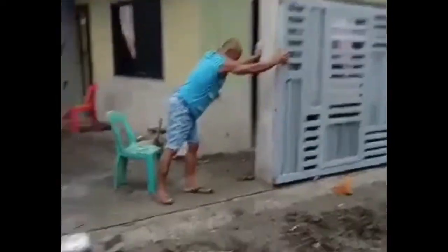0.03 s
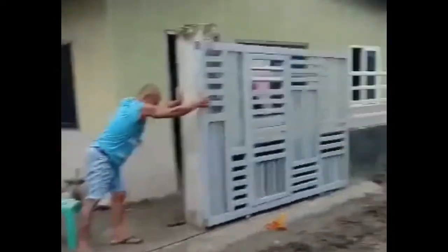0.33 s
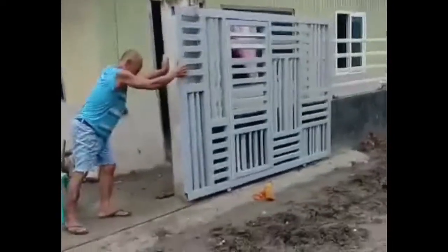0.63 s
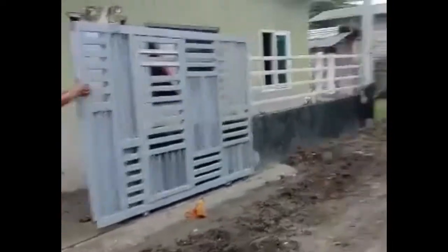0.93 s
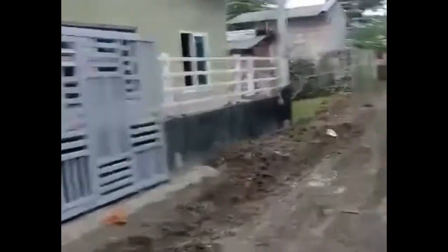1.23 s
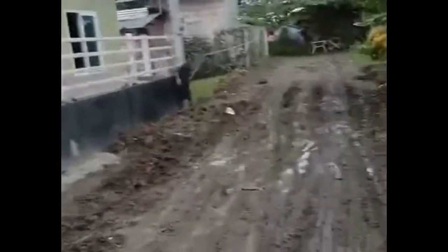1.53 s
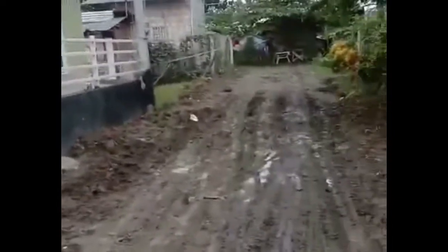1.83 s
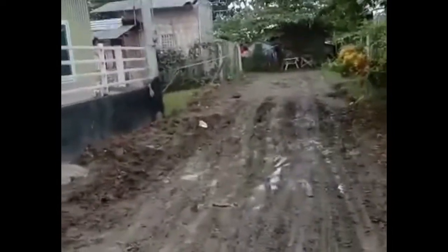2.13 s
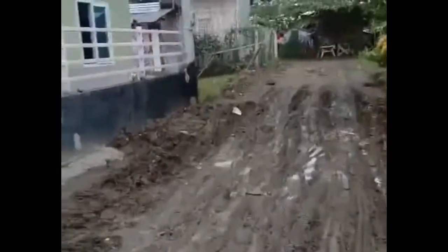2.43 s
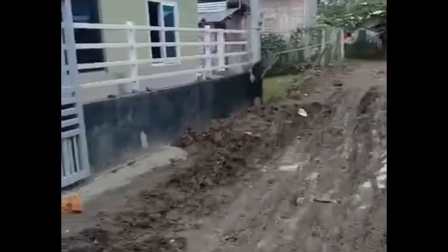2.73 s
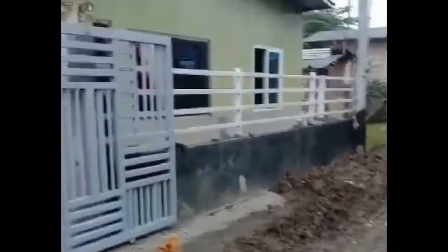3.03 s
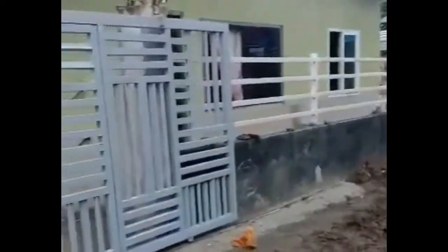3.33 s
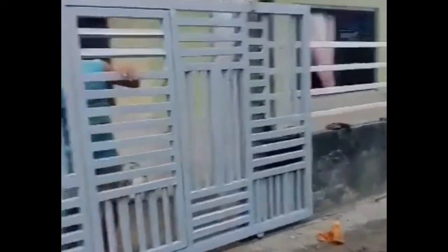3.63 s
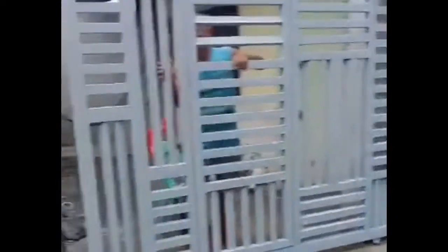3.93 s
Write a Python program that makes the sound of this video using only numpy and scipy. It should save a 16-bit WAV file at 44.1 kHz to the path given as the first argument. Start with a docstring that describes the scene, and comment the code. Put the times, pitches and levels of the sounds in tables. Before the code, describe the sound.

Metal gate rolling with gritty grinding and knocks, ending in a few ringing clanks.

```python
"""A barred steel gate rumbles and knocks along its ground track, then clanks steel on steel.
Its wheels grind over grit and set the frame ringing; bumps knock and rattle it.
Thin squeaks come on the way and between the clanks at the end of the travel.
Heard from beside the gate, outside a house in still air, on one hand-held microphone
that takes a few soft bumps."""
import sys
import numpy as np
from scipy import signal
from scipy.fft import rfft, irfft
from scipy.io import wavfile

SR = 44100
rng = np.random.default_rng(int(sys.argv[2]) if len(sys.argv) > 2 else 0)


def bounce(signal):
    """Save signal as a 16-bit WAV file at the path given by the first command-line argument."""
    frames = np.transpose(np.atleast_2d(signal))
    limited = np.clip(frames, -1, 1)
    pcm = np.round(limited * 32767).astype(np.int16)
    wavfile.write(sys.argv[1], SR, pcm)


N = 176400
TIME = np.arange(N) / SR
TAIL = TIME[:32768]   # seconds since a strike
WHEELS_STOP_S = 2.93
TICK_RISE_S, BOOM_RISE_S = 0.0011, 0.0019   # ringing builds up as it spreads through the bars

# How hard the wheels grind, down at the track: time_s, level_db
ROLL_LEVEL = [(0, -26), (.2, -34.5), (.33, -33), (.5, -37.5), (.64, -43), (.74, -38.5), (.79, -36),
              (.86, -31), (.97, -26), (1.15, -27.5), (1.33, -28), (1.55, -31), (1.75, -35.5), (2.05, -41.5),
              (2.25, -40.5), (2.35, -36), (2.6, -41), (2.84, -40.5), (2.93, -48.5), (3.02, -54.5),
              (3.55, -54.5), (3.64, -50.5), (3.72, -54), (4, -97)]
# Colour of the barred frame: frequency_hz, level_db
FRAME_COLOUR = [(150, -20), (250, -2.5), (370, -7), (520, -10), (720, -5), (900, -2), (1050, -6.5),
                (1400, -4.5), (1900, -9), (2250, -6), (2900, -14), (4000, -19.5), (5300, -14.5),
                (6200, -24), (7300, -24), (8100, -39.5), (9500, -34.5), (13000, -42)]
# Hollow hum of the tubes, lingering as the wheels slow: frequency_hz, level_db
HUM_COLOUR = [(150, -25), (520, 4), (620, 0.5), (720, 1), (890, 3), (1020, -30), (1170, -16), (1270, 5),
              (1370, -4.5), (1500, -35), (3000, -72)]
# Rumble of the ground under the gate: frequency_hz, level_db
RUMBLE_COLOUR = [(25, -28), (45, -56), (70, -1), (110, -6), (200, -3), (320, -9), (600, -35), (2000, -65)]
def rolling(spots=6, reference_db=-35.5):
    """The wheels crush grit and shake the frame at several spots; the tubes hum and the track rumbles."""
    level_db = roll_db(TIME)
    swing_db = level_db - reference_db
    hum = amp(-39 + 0.89 * swing_db) * np.clip((WHEELS_STOP_S - TIME) * 10, 0, 1)
    frame = 0
    for _ in range(spots):
        for force, colour in ((amp(level_db), FRAME_COLOUR), (hum, HUM_COLOUR)):
            grind = force * wandering_load() * grit_jolts()
            ring = steel(colour, patchy_db=4.5) * swell(rise_s=0.0016)
            frame = frame + drive(grind, ring)
    rumble = noise(RUMBLE_COLOUR, N) * amp(-44 + 0.53 * swing_db)
    return frame / np.sqrt(spots) + rumble


def roll_db(time_s):
    """How hard the wheels grind at a given moment."""
    return np.interp(time_s, *np.transpose(ROLL_LEVEL))


def wandering_load(shifts_per_s=16, spread_db=6.5):
    """One spot's share of the load wanders, so the ringing keeps changing colour; rms 1."""
    knots = np.clip(rng.standard_normal(400), -1.6, 1.6)
    return unit(amp(spread_db * np.interp(TIME * shifts_per_s, np.arange(len(knots)), knots)))


def grit_jolts(per_s=700, spread_db=3.5):
    """Grit gives a wheel small random jolts of uneven size; rms 1."""
    sizes = amp(spread_db * np.minimum(rng.exponential(1, N), 4)) * rng.choice([-1, 1], N)
    return unit(sizes * (rng.random(N) < per_s / SR))


# Ringing time of the steel: frequency_hz, t60_s
STEEL_DECAY = [(200, 0.19), (700, 0.31), (1300, 0.27), (2500, 0.24), (5500, 0.21), (11000, 0.1)]
# Hollow resonances of the frame: centre_hz, width_hz, boost_db
FRAME_RESONANCES = [(307, 23.4, 9), (449, 16.6, 6.5), (640, 58, 3.5), (728, 28, 4.5), (882, 12, 7),
                    (1270, 71, 9), (1544, 54, 0.5), (1680, 24, 2.5), (5650, 270, 2)]
def steel(colour, ring_scale=1, tilt_db=0, patchy_db=4, patch_width_hz=230):
    """The gate struck at one spot: countless close modes of random strength, the highest dying first."""
    f = np.fft.rfftfreq(len(TAIL), 1 / SR)
    # each spot favours some groups of modes
    groups = np.interp(f / patch_width_hz, np.arange(400), rng.standard_normal(400))
    db = patchy_db * groups * f / (f + 1000)
    db += tilt_db * np.log2(np.clip(f, 200, 3000) / 1000)
    db += sum(boost / (1 + (2 * (f - centre) / width) ** 2) for centre, width, boost in FRAME_RESONANCES)
    db += over_hz(*np.transpose(colour), len(TAIL))
    modes = rfft(unit(irfft(rfft(rng.standard_normal(len(TAIL))) * amp(db))))
    hz, t60_s = np.transpose(STEEL_DECAY)
    bands = [irfft(modes * over_hz(hz, share, len(TAIL))) for share in np.eye(len(hz))]
    return sum(band * decay(t60 * ring_scale) for band, t60 in zip(bands, t60_s))


# Steel meets steel at the end of the track: start_s, clang_db, tick_db
END_BLOWS = [(3.184, -11.5, -16), (3.2, -20.5, -16), (3.236, -14, -13.5), (3.275, -14, -33),
             (3.463, -24.5, -22.5), (3.687, -14, -10)]
# Colour of the whole gate clanging: frequency_hz, level_db
CLANG_COLOUR = [(150, -37), (550, -45), (750, -13), (1050, -8.5), (1260, -2.5), (1420, -5.5), (1750, 0),
                (2400, -0.5), (2900, -4), (3500, -9.5), (5500, -12.5), (8000, -17.5), (13000, -20)]
# Clear tones of the struck tubes: pitch_hz, level_db, t60_s
TUBE_TONES = [(1010, -18.5, 1), (1300, -5.5, 0.62), (1380, -10.5, 0.36), (1720, 0, 0.32), (1940, -2.5, .35),
              (2090, -5, 0.2), (2140, 2, 0.2), (2440, -21.5, 0.58), (2360, 3, 0.21), (2554, -5, 0.28),
              (2633, 0.5, 0.35), (3570, -12.5, 0.5), (4700, -18, 0.5), (5230, -9, 0.3)]
def clanks(tubes_db=-10.5, uneven_db=2):
    """Hard blows set the whole gate clanging, with the tones of its tubes on top."""
    out = np.zeros(N)
    hz, mode_db, t60_s = np.transpose(TUBE_TONES)[:, :, None]
    tones = np.sin(2 * np.pi * hz * TAIL) * decay(t60_s)
    for start_s, clang_db, tick_db in END_BLOWS:
        strength = amp(tubes_db + mode_db + uneven_db * rng.standard_normal(hz.shape))
        tubes = np.sum(strength * rng.choice([-1, 1], hz.shape) * tones, axis=0)
        clang = (steel(CLANG_COLOUR, ring_scale=1.54) + tubes) / np.sqrt(2)
        add(out, start_s, amp(clang_db) * clang * swell(rise_s=0.004) + amp(tick_db) * tick())
    return highpass(out, hz=680, order=4)   # hard blows leave the low modes still


def first_touch(start_s=3.154, pitch_hz=785, level_db=-25.5):
    """One tube rings a hollow note as the gate makes contact, just before the clanks."""
    out = np.zeros(N)
    note = np.sin(2 * np.pi * pitch_hz * TAIL) * decay(t60_s=0.1) * swell(BOOM_RISE_S)
    add(out, start_s, amp(level_db) * note)
    return out


# Knocks of the frame: bumps along the track, then the gate's first touch and the low boom under
# its first clank: start_s, boom_db, tilt_db_per_octave, tick_db
FRAME_KNOCKS = [(.046, -39, -3, -29.5), (.060, -20, -0.5, -30), (.084, -21, 0.5, -32),
                (.102, -17.5, -1, -32), (.125, -28, -1, -50), (.221, -33, -7, -38), (.328, -29, 1.5, -55),
                (0.364, -26, 1.5, -50), (.478, -40, 2, -40), (.549, -33.5, 11, -41), (.753, -30, -1.5, -53),
                (.783, -20, -2, -26), (.891, -35, 5, -32.5), (.975, -24, 2.5, -42), (1.03, -36, -19, -42),
                (1.092, -24, 7.5, -30.5), (1.188, -16, 0, -22.5), (1.225, -21, -1.5, -35),
                (1.271, -22, -1.5, -27), (1.322, -50, -6, -34), (1.385, -63, -3, -54),
                (1.454, -21, 2.5, -35), (1.589, -22, 3, -25.5), (1.662, -27, -4.5, -32),
                (1.770, -36, -3, -55), (1.792, -28.5, 2, -28.5), (1.882, -36.5, 7, -66),
                (1.963, -36, 11, -47), (2.057, -35.5, 8, -34), (2.152, -53, -13, -40.5),
                (2.181, -33.5, -7.5, -42), (2.388, -23.5, -2, -30.5), (2.423, -30.5, 3, -32.5),
                (2.557, -35.5, 2, -27), (2.754, -30, -2, -22.5), (2.792, -37, -13, -63),
                (2.871, -20, -1, -24), (2.887, -20.5, -2.5, -52), (2.925, -30.5, -6.5, -47),
                (3.154, -23.5, 4.5, -35), (3.205, -33.5, -8, -45)]
# Colour of the frame booming after a knock: frequency_hz, level_db
BOOM_COLOUR = [(150, -19), (300, -13), (450, -12), (600, -6), (760, -1.5), (1000, -4.5), (1350, -1.5),
               (1600, -4.5), (1900, -7.5), (2300, -5.5), (3000, -14), (5500, -24), (8000, -34),
               (13000, -45)]
def knocks():
    """Each knock ticks at the point of contact and swells into the frame."""
    out = np.zeros(N)
    for start_s, boom_db, tilt_db, tick_db in FRAME_KNOCKS:
        boom = steel(BOOM_COLOUR, tilt_db=tilt_db) * swell(BOOM_RISE_S)
        add(out, start_s, amp(boom_db) * boom + amp(tick_db) * tick())
    return highpass(out, hz=240)   # a knock hardly moves the lowest modes


# Colour of a hard tick on the steel: frequency_hz, level_db
TICK_COLOUR = [(300, -45), (600, -21.5), (1200, -14), (2400, -3), (3300, -8), (4400, 0), (5500, 0),
               (6200, -4.5), (7300, -5), (8100, -20.5), (9500, -11.5), (11000, -16.5), (13000, -32.5)]
def tick(crack_db=-4, crack_s=0.013):
    """A hard contact: a crack, then bright, short ringing."""
    crack = amp(crack_db) * np.exp(-TAIL / crack_s)
    return steel(TICK_COLOUR, patchy_db=3.5) * swell(TICK_RISE_S) * (1 + crack) / 2


def chatter(count=32, relative_db=-10.5, spread_db=3.5):
    """Loose parts tick now and then while the gate moves, each with a colour of its own."""
    out = np.zeros(N)
    for k, (jitter, size) in enumerate(rng.uniform(-1, 1, (count, 2))):
        start_s = (k + 1 + jitter) / (count + 1) * WHEELS_STOP_S
        level_db = roll_db(start_s) + relative_db + spread_db * size
        ring = steel(TICK_COLOUR, ring_scale=0.7, patchy_db=9) * swell(TICK_RISE_S)
        add(out, start_s, amp(level_db) * ring)
    return out


def grit_bursts(count=70, low_hz=2790, high_hz=11950, relative_db=-4.5, spread_db=4.5):
    """Bits of grit burst under the wheels, each crunching in a narrow band of its own."""
    out = np.zeros(N)
    for when, pitch, size in rng.random((count, 3)):
        start_s, hz = when * WHEELS_STOP_S, low_hz * (high_hz / low_hz) ** pitch
        level_db = roll_db(start_s) + relative_db + spread_db * (2 * size - 1)
        level_db -= 8.5 * np.log2(hz / low_hz)   # higher bursts are fainter
        band = unit(signal.lfilter(*signal.iirpeak(hz, Q=14, fs=SR), rng.standard_normal(len(TAIL))))
        add(out, start_s, amp(level_db) * band * swell(TICK_RISE_S) * decay(t60_s=0.12))
    return out


# Thin squeaks and short scrapes at the gate: start_s, length_s, pitch_hz, width_hz, level_db
STEEL_RUBS = [(1.874, 0.027, 3820, 350, -46), (2.332, 0.021, 9600, 500, -54.5),
              (3.082, 0.038, 5370, 2400, -45), (3.113, 0.044, 3400, 786, -47.5),
              (3.433, 0.027, 10600, 150, -49.5), (3.593, 0.067, 5200, 90, -52.5),
              (3.651, 0.085, 3740, 196, -50.5)]
def squeaks():
    """Rubbing steel sings briefly in one resonance."""
    out = np.zeros(N)
    for start_s, length_s, pitch_hz, width_hz, level_db in STEEL_RUBS:
        radius = np.exp(-np.pi * width_hz / SR)
        resonator = [1, -2 * radius * np.cos(2 * np.pi * pitch_hz / SR), radius ** 2]
        tone = unit(signal.lfilter([1, 0, -1], resonator, rng.standard_normal(len(TAIL))))
        arch = np.sqrt(np.abs(np.sin(np.pi * np.minimum(TAIL / length_s, 1))))
        add(out, start_s, amp(level_db) * tone * arch)
    return out


# Bumps right on the hand-held microphone: start_s, level_db, pitch_hz
HANDLING_BUMPS = [(1.962, -32, 110), (2.084, -16.5, 147), (2.634, -31, 80), (3.331, -30, 190),
                  (3.35, -25.5, 110), (3.373, -30, 160), (3.382, -22, 105), (3.403, -26, 150),
                  (3.438, -31, 95), (3.478, -30, 100), (3.509, -34.5, 170), (3.55, -47, 110),
                  (3.614, -37, 140), (3.631, -24, 115), (3.661, -26, 125), (3.693, -30.5, 130),
                  (3.891, -35.5, 100), (3.949, -35.5, 95)]
def microphone_bumps(rise_s=0.0049):
    """Bumps reach the microphone as soft, heavily damped low thumps."""
    out, age = np.zeros(N), TAIL / rise_s
    envelope = (age * np.exp(1 - age)) ** 2
    for start_s, level_db, pitch_hz in HANDLING_BUMPS:
        add(out, start_s, amp(level_db) * envelope * np.sin(2 * np.pi * pitch_hz * TAIL))
    return out


# Still air outside the house, all around the microphone: frequency_hz, level_db
AIR_COLOUR = [(25, 2), (80, 20), (300, 8), (1000, -4), (3000, -24), (7000, -23), (13000, -24)]
def outdoor_air(level_db=-57):
    """A faint, steady, low hush behind the gate."""
    return amp(level_db) * noise(AIR_COLOUR, N)


def amp(db):
    """Decibels to gain."""
    return 10 ** (np.asarray(db) / 20)


def unit(x):
    """Scale to rms 1."""
    return x / np.sqrt(np.mean(x ** 2) + 1e-20)


def add(out, start_s, sound):
    """Mix a sound in at a time."""
    i = max(int(start_s * SR), 0)
    out[i:i + len(sound)] += sound[:N - i]


def swell(rise_s):
    """The quick build-up of a struck sound."""
    return 1 - np.exp(-TAIL / rise_s)


def decay(t60_s):
    """Ringing that falls 60 dB in the given time."""
    return np.exp(-np.log(1000) * TAIL / t60_s)


def over_hz(hz, values, size):
    """A table spread over the bins of a spectrum, on a log-frequency axis."""
    return np.interp(np.log(np.fft.rfftfreq(size, 1 / SR) + 0.0012), np.log(hz), values)


def noise(colour, size):
    """Coloured noise of rms 1."""
    gains = amp(over_hz(*np.transpose(colour), size))
    return unit(irfft(rfft(rng.standard_normal(size)) * gains, size))


def drive(force, response):
    """Play a force through a ringing body, keeping its power."""
    return signal.fftconvolve(force, response / np.sqrt(np.sum(response ** 2)))[:N]


def highpass(x, hz, order=2):
    """Roll off the bass."""
    return signal.sosfilt(signal.butter(order, hz, "high", fs=SR, output="sos"), x)


def scene():
    """The gate and the air around it, in mono at the microphone."""
    gate = rolling() + chatter() + grit_bursts() + knocks() + first_touch() + clanks() + squeaks()
    return (gate + microphone_bumps() + outdoor_air())[None]


def record(dry):
    """The recorder drops the deepest bass and the top."""
    top_cut = signal.ellip(10, 0.2, 75, 13300, fs=SR, output="sos")
    return signal.sosfilt(top_cut, highpass(dry, hz=50))


dry = scene()
out = record(dry)
bounce(out)
```